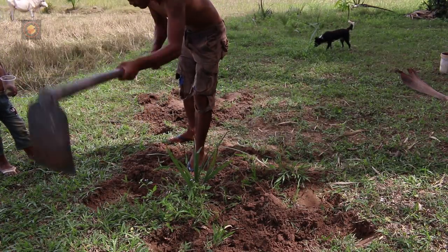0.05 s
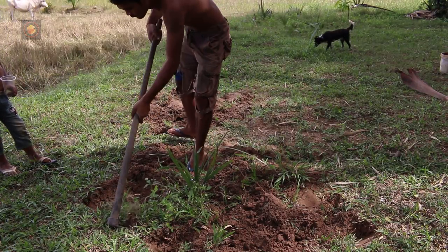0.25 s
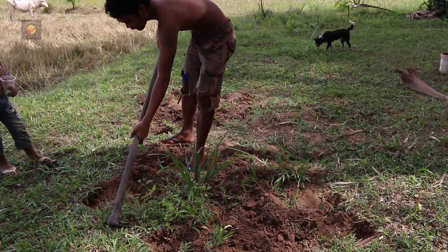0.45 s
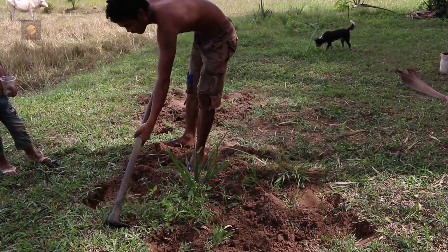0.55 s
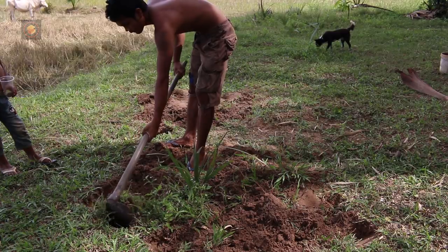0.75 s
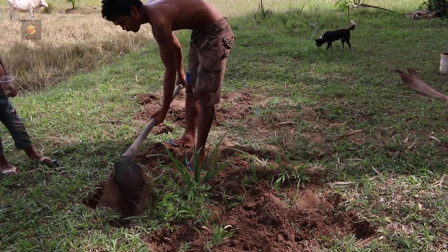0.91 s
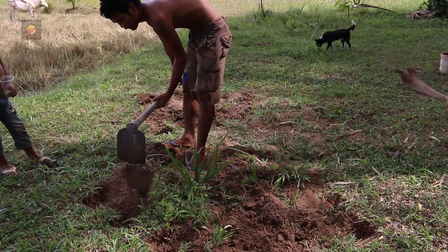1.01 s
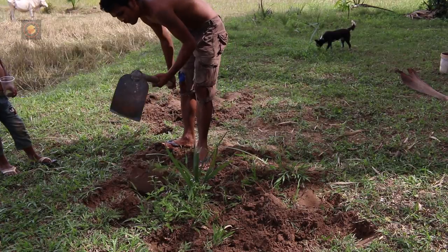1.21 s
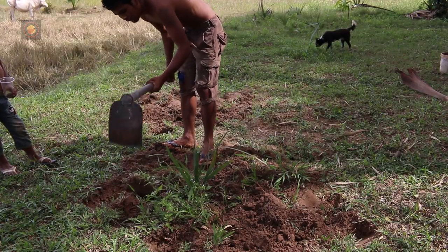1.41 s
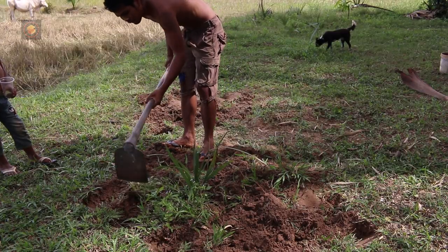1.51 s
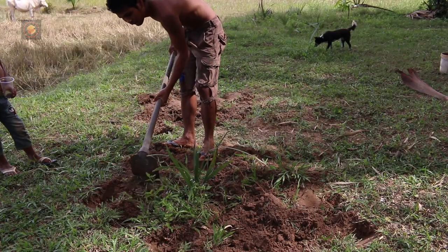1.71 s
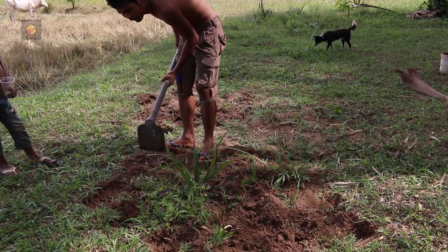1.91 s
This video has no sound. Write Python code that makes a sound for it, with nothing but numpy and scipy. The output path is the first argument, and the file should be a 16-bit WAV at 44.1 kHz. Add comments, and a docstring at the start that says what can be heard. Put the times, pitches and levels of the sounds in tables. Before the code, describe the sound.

A steel hoe chops into damp soil at 0.2 seconds with a gritty crack and thud, slightly left and a few metres away. From 0.5 seconds roots snap as a clod tears loose, and around 1 second dirt slides off the faintly ringing blade. A lighter chop lands at 1.7 seconds, and crumbs patter. Behind lie a quiet outdoor rumble, hiss, insects and two faint distant chirps.

```python
"""A crack and a thud: a steel hoe on a wooden handle bites into damp soil, in a grassy yard.
The microphone is a few metres off, the hoe slightly to its left. After the full swing the clod is
levered out, roots snap and soil slides off the ringing blade; a light chop follows.
Behind the work lie a low outdoor rumble, airy hiss, a band of insects and two faint far chirps."""
import sys
import numpy as np
from scipy import signal
from scipy.fft import rfft, irfft, next_fast_len
from scipy.io import wavfile

SR = 44100
rng = np.random.default_rng(int(sys.argv[2]) if len(sys.argv) > 2 else 0)


def master(y):
    """Save y as 16-bit WAV."""
    cut = np.clip(np.atleast_2d(y).T, -1, 1)
    pcm = np.round(cut * 32767)  # scale
    wavfile.write(sys.argv[1], SR, pcm.astype(np.int16))


N = 85995
TIME = np.arange(N) / SR
GRAINS_PER_S = 12000

# ringing modes of the steel blade: f/Hz, level/dB, t60/s
BLADE_MODES = [(1519, -6, .09), (1987, -3, .09), (2350, -1, .07), (2680, -2, .07), (2808, 0, .1),
               (3107, 2, .1), (3300, -3, .06), (3475, -3, .09), (3850, -2, .07), (4090, -4, .06),
               (4670, -5, .09), (5110, -6, .09), (6060, -7, .07), (6250, -6, .08), (9000, -11, .06),
               (10700, -11, .06)]
# hiss of turf and fine dust passing over steel: f/Hz, level/dB
HISS_SPECTRUM = [(1500, -2), (4000, 2), (7000, 0.5), (10000, 1), (16000, -3)]


def chops():
    """The edge slices turf, cuts grit and stops with a crack; the earth thuds, handle and blade ring."""
    # strokes: blade stops t/s, grit rise/s, grit fall/s, grit/dB, earth/dB, handle/dB, blade/dB,
    # crack/dB, crack f/Hz, slice lead/s, slice/dB, slice low-pass f/Hz, thump/dB, thump lag/s
    strokes = [(0.2188, 0.019, 0.085, -20, -22, -26.5, -32, -8, 910, 0.0036, -29.5, 15300, -19, 0.00201),
               (1.7086, 0.038, 0.026, -27.5, -38, -45.5, -47.5, -18.5, 3240, 0.0084, -30, 4400, -30.5, 0.0011)]
    # steel cutting gritty soil: f/Hz, level/dB
    grit_spectrum = [(60, -38), (400, -41), (1500, -7), (2300, 6), (3400, 6.5), (5000, -1.5), (8000, -1.5),
                     (12000, -5), (16000, -11)]
    # packed soil giving way: f/Hz, level/dB
    earth_spectrum = [(25, -45), (60, -22), (110, -7), (290, 0), (520, -5), (760, -2), (1050, -3),
                      (1600, -16), (4000, -40)]
    # ringing modes of the wooden handle: f/Hz, level/dB, t60/s
    handle_modes = [(107.6, -11.5, 0.16), (180, -6.5, .1), (225.3, -5.5, 0.12), (300, -1.5, 0.1),
                    (365, -4, 0.042), (435, -0.5, 0.092), (610, -3, 0.076), (675, -4, 0.084),
                    (739, 1, 0.053), (844, -7.5, 0.05), (890, -21, 0.049), (1010, -2, 0.098),
                    (1216, -9, .06), (1280, 0.5, 0.056)]
    out = 0
    for (s, rise, fall, grit_db, earth_db, handle_db, blade_db,
         crack_db, crack_hz, lead, slice_db, top_hz, thump_db, lag) in strokes:
        fibres = butterworth(grains(GRAINS_PER_S, spread_db=-3), 1, top_hz, "low")
        slicing = texture(fibres, HISS_SPECTRUM) * swell(s - lead, 3.8 * lead, 11.8 * lead)
        grit = grains(GRAINS_PER_S, spread_db=5)
        bite = from_db(grit_db) * swell(s, rise, fall)
        cutting = texture(grit, grit_spectrum) * bite + from_db(-14.5) * rubbed_blade(grit * bite)
        earth = texture(grains(GRAINS_PER_S, spread_db=1), earth_spectrum) * swell(s, .008, .1)
        thump = ping(s + lag, hz=324.6, t60=.048)
        cycles = (TIME - s) * crack_hz
        crack = -np.cos(2 * np.pi * cycles) * np.exp(-(cycles / .8) ** 2)
        out += from_db(slice_db) * slicing + cutting + from_db(crack_db) * crack
        out += from_db(earth_db) * earth + from_db(thump_db) * thump
        out += from_db(handle_db) * struck(handle_modes, s + .00039)
        out += from_db(blade_db) * struck(BLADE_MODES, s)
    return out


def levering():
    """The clod tears loose in a dull crackle; each snapping root throws a little more grit."""
    # roots and clods snapping: t/s, level/dB, f/Hz
    snaps = [(0.53, -38, 440), (.661, -39.5, 640), (0.732, -35.5, 514), (.756, -60, 800), (0.785, -33, 236),
             (.800, -38.5, 460), (0.8072, -35.5, 673), (0.8076, -28, 2190), (0.869, -37, 380),
             (0.884, -54, 420), (0.895, -28, 4530), (.987, -36.5, 310), (.991, -38, 1150),
             (1.022, -45, 405)]
    # course of the tearing as the clod lifts: t/s, level/dB
    tear_levels = [(0.549, -62.5), (.67, -52.5), (.74, -48), (.83, -55), (.885, -45), (.92, -60),
                   (.99, -65), (1.07, -59)]
    # soil tearing apart: f/Hz, level/dB
    tear_spectrum = [(40, -38), (100, -15), (280, -1.5), (900, -8), (1600, -12.5), (3500, -13),
                     (7000, -20.5), (16000, -32)]
    times, levels = np.transpose(tear_levels)
    effort = from_db(np.interp(TIME, times, levels)) * (TIME > times[0]) * (TIME < times[-1])
    bursts = sum(from_db(db - 18) * swell(s, rise=.004, fall=.025) for s, db, _ in snaps)
    crackle = texture(grains(per_s=2200, spread_db=3.5), tear_spectrum)
    pops = sum(from_db(db) * ping(s, hz, t60=7 / hz) for s, db, hz in snaps)
    return (effort + bursts) * crackle + pops


def spilling_soil():
    """Crumbs and fine dust slide over the blade, which sings faintly, and patter into the grass."""
    # slides of loose soil: peak t/s, crumbs/dB, rise/s, fall/s, dust/dB
    slides = [(.30, -50.5, 0.11, 0.27, -60), (.895, -51, 0.32, 0.45, -50.5), (.99, -40, 0.19, 0.2, -42),
              (1.023, -49, 0.057, 0.04, -35), (1.2, -60.5, 0.7, 1, -60), (1.412, -50, 0.18, 0.23, -75),
              (1.735, -57, .05, 0.17, -60), (1.815, -51, .15, 0.19, -51)]
    # patter of crumbs: f/Hz, level/dB
    crumb_spectrum = [(40, -35), (200, -3.5), (1200, -2.5), (2400, 4), (4200, -3), (7000, 0), (11000, -8),
                      (16000, -37)]
    crumb_power = sum((from_db(db) * swell(s, rise, fall)) ** 2 for s, db, rise, fall, _ in slides)
    dust_power = sum((from_db(db) * swell(s, rise, fall)) ** 2 for s, _, rise, fall, db in slides)
    crumbs = np.sqrt(crumb_power) * texture(grains(per_s=7000, spread_db=1.5), crumb_spectrum)
    dust = np.sqrt(dust_power) * texture(grains(GRAINS_PER_S, spread_db=7.5), HISS_SPECTRUM)
    scrape = butterworth(dust, 6, 4970, "high")  # fine dust excites only the blade's upper modes
    return crumbs + dust + rubbed_blade(from_db(-11) * crumbs + from_db(3.5) * scrape)


def rubbed_blade(force):
    """The blade sings with the grains that pass over it."""
    ring = struck(BLADE_MODES, 0)
    return signal.fftconvolve(force, ring[None] / np.linalg.norm(ring), axes=1)[:, :N]


def yard_echo(x):
    """Quick scatter from the ground and a longer tail, different on each side."""
    # colour of the scattered sound: f/Hz, gain/dB
    scatter_colour = [(30, -45), (100, -24), (400, -14), (1000, -7), (3000, 0), (8000, 1), (16000, -2)]
    tail = 0
    for db, t60 in (-14, .092), (-12.5, .31):
        echoes = rng.standard_normal((2, N)) * fade(TIME, t60) * (1 - fade(TIME, t60 / 2))
        tail += from_db(db) * echoes / np.linalg.norm(echoes[0])
    return coloured(signal.fftconvolve(x[None], tail, axes=1)[:, :N], scatter_colour)


def open_air():
    """A steady low rumble in the centre and a wide, airy hiss."""
    # outdoor rumble: f/Hz, level/dB
    rumble_spectrum = [(20, -4), (32, -90), (50, -5), (85, -5), (130, -1.5), (200, -10), (320, -18.5),
                       (600, -20.5), (1500, -25.5), (5000, -37.5), (16000, -65)]
    # airy hiss: f/Hz, level/dB
    air_spectrum = [(40, -11), (130, 7.5), (400, 1), (1000, -2.5), (3000, -1), (6500, -6.5), (9500, -6),
                    (12000, -8.5), (16000, -13.5)]
    rumble = from_db(-51.5) * texture(rng.standard_normal(N), rumble_spectrum)
    return rumble + from_db(-56) * texture(rng.standard_normal((2, N)), air_spectrum)


def insects(hz=8360, width_hz=910, flutter_db=1.5, flutters_per_s=20):
    """Insects on both sides merge into a high, narrow band whose level wavers at random."""
    band = butterworth(rng.standard_normal((2, N)), 2, [hz - width_hz / 2, hz + width_hz / 2], "band")
    flutter = np.interp(TIME * flutters_per_s, np.arange(200), rng.standard_normal(200))
    return from_db(-61 + flutter_db * flutter) * rms_one(band)


def far_chirps(hz=3570, half_width_s=.013):
    """Two faint pips on one pitch, far away."""
    # distant chirps: t/s, level/dB
    chirps = [(0.501, -56.5), (1.392, -57)]
    envelope = sum(from_db(db) * np.exp(-((TIME - s) / half_width_s) ** 2) for s, db in chirps)
    return envelope * np.sin(2 * np.pi * hz * TIME)


def grains(per_s, spread_db):
    """Random clicks of uneven size; flying grit reaches each side differently in the treble; rms 1."""
    sizes = from_db(spread_db * np.minimum(rng.exponential(1, N), 3))
    sizes *= rng.random(N) < per_s / SR
    scattered = butterworth(sizes * rng.standard_normal((2, N)), 1, 3430, "high")
    return rms_one(sizes * rng.choice([-1, 1], N) + from_db(-2) * scattered)


def struck(modes, s):
    """A body's modes ring from the moment s, in alternating polarity."""
    return sum((-1) ** k * from_db(db) * ping(s, hz, t60) for k, (hz, db, t60) in enumerate(modes))


def ping(s, hz, t60):
    """A damped sine that starts at s."""
    t = np.maximum(TIME - s, 0)
    return np.sin(2 * np.pi * hz * t) * fade(t, t60)


def swell(s, rise, fall):
    """Grows 60 dB in rise seconds up to the moment s, then drops 60 dB in fall seconds."""
    return fade(s - TIME, rise) * fade(TIME - s, fall)


def fade(t, t60):
    """Falls by 60 dB in t60 seconds."""
    return np.exp(-np.log(1000) * np.maximum(t, 0) / t60)


def texture(x, spectrum):
    """Noise or grains coloured by a spectrum; rms 1."""
    return rms_one(coloured(x, spectrum))


def coloured(x, points):
    """Minimum-phase filter that follows points of f/Hz, gain/dB."""
    size = 2 * next_fast_len(N)
    hz, db = np.transpose(points)
    bin_hz = np.arange(size // 2 + 1) * SR / size
    gain = from_db(np.interp(np.log(bin_hz + 1), np.log(hz), db))
    cepstrum = irfft(np.log(gain))
    cepstrum[1:size // 2] *= 2
    cepstrum[size // 2 + 1:] = 0
    return irfft(rfft(x, size) * np.exp(rfft(cepstrum)))[..., :N]


def butterworth(x, order, hz, kind):
    return signal.sosfilt(signal.butter(order, hz, kind, fs=SR, output="sos"), x)


def from_db(db):
    return 10 ** (np.asarray(db) / 20)


def rms_one(x):
    return x / np.sqrt(np.mean(x ** 2) + 1e-20)


def scene(right_lag_s=.000043):
    """The hoe works slightly left of the microphone, so its right side is later and duller."""
    # colour of the direct sound on the left and on the right: f/Hz, gain/dB
    left_colour = [(200, 0), (3000, -.5), (6000, .6), (9000, 2), (14000, 2.5)]
    right_colour = [(200, 0), (3000, 0), (6000, -.8), (9000, -2), (14000, -4)]
    hoe = chops() + levering() + spilling_soil()
    bin_hz = np.arange(N + 1) * SR / (2 * N)
    delayed = irfft(rfft(hoe[1], 2 * N) * np.exp(-2j * np.pi * bin_hz * right_lag_s))[:N]
    direct = np.array([coloured(hoe[0], left_colour), coloured(delayed, right_colour)])
    return direct + yard_echo(hoe.mean(axis=0)) + open_air() + insects() + far_chirps()


def record(dry):
    """The top is cut steeply above 15850 Hz."""
    return signal.sosfilt(signal.ellip(12, .1, 80, 15850, fs=SR, output="sos"), dry)


dry = scene()
out = record(dry)
master(out)
```